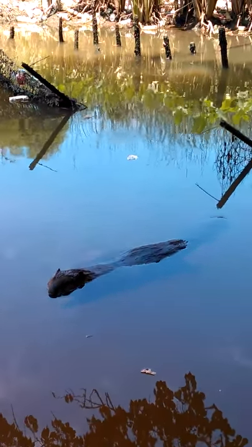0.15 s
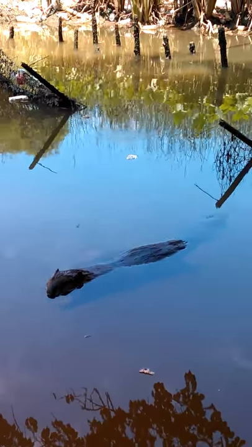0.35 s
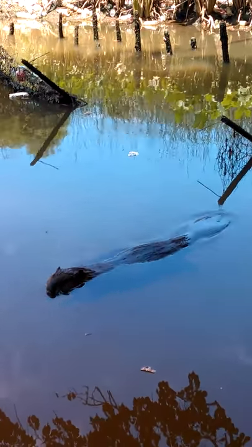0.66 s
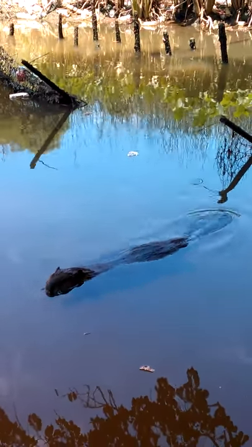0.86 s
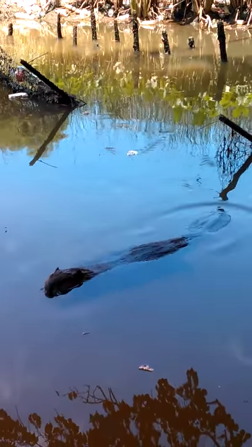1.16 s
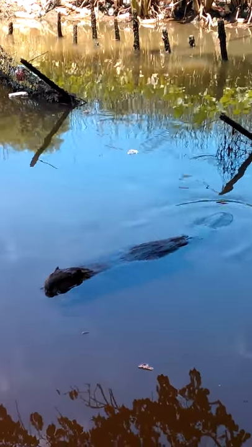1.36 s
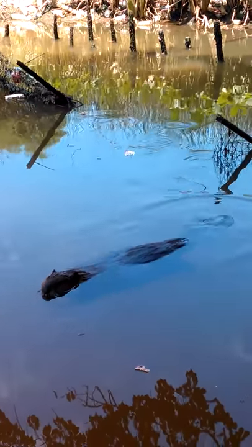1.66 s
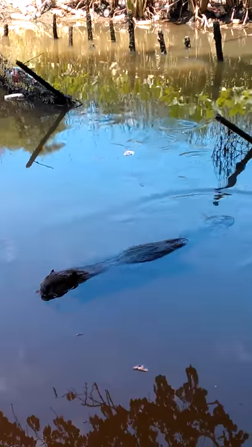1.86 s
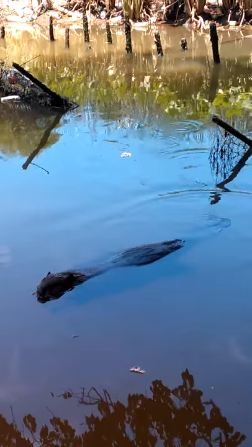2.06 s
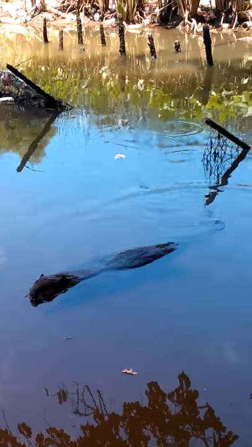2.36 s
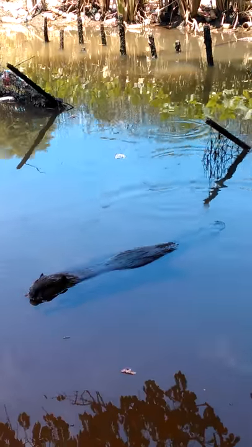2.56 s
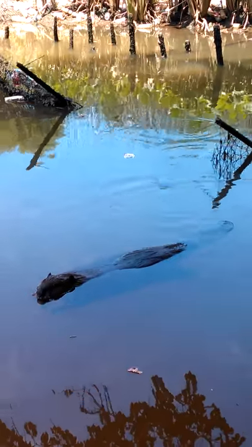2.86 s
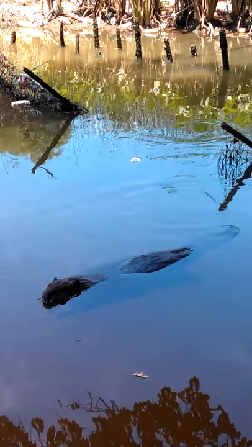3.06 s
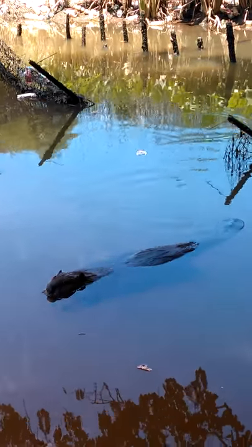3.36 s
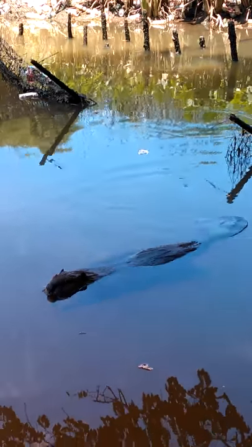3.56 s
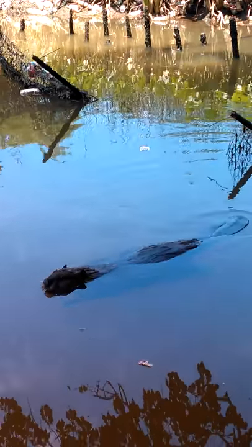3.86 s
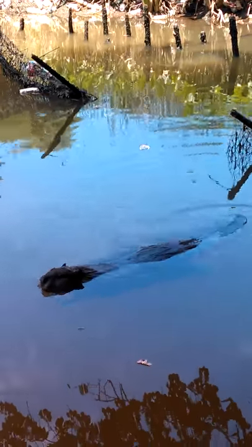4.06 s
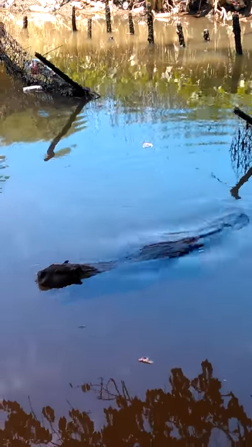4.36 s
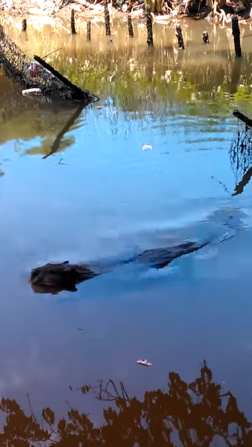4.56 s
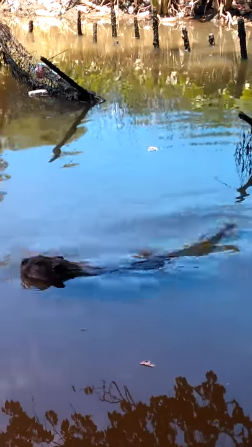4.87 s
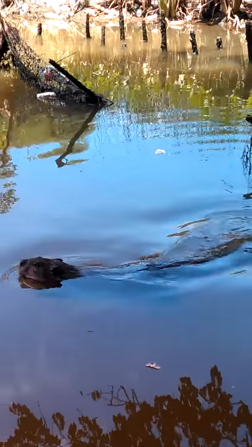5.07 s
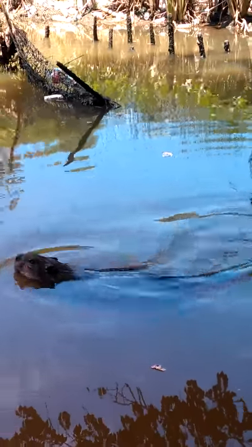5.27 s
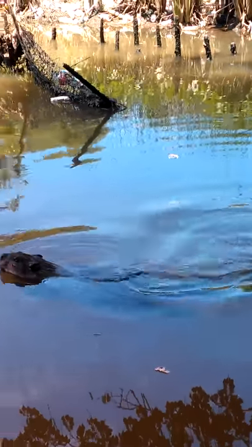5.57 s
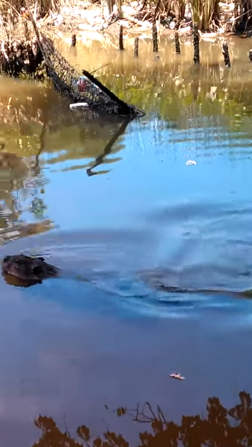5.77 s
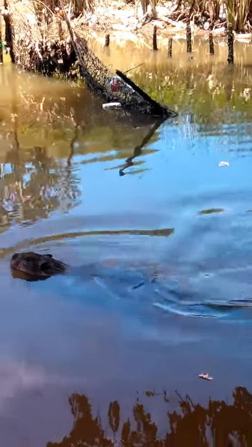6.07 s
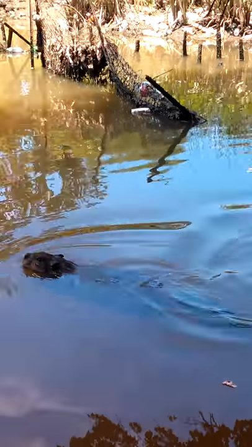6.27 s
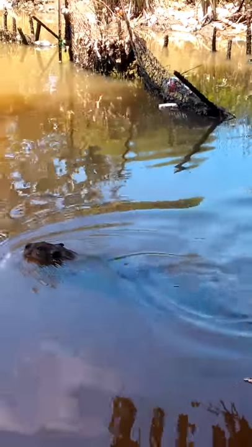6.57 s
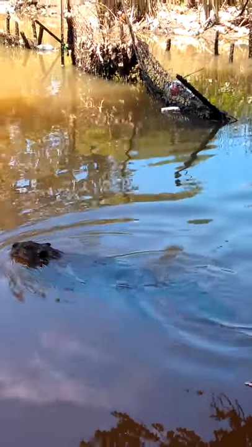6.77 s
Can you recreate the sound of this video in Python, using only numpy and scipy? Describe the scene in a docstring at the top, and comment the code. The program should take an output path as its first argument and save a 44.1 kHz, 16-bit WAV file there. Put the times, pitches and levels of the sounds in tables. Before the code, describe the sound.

Faint birds whistle, chirp and trill by a wooded pond over a steady low rumble of distant traffic.

```python
"""Seven seconds by a wooded pond. Far traffic rumbles throughout, over faint microphone hiss:
tyres hum, exhausts throb together. A bird opens with a scooped whistle, then come two thin, falling
'tseer' calls, echoed by the trees. After 2 s follow a distant bird's soft 'chack', a peep and a buzzy call;
from 3.5 s rough chips climb into a quick trill. Just after 5 s sharp ticks and rustles sound close by,
and again near 6.5 s, with a last 'tseer' and a faint whistle. Another far 'chack' ends it."""
import sys
import numpy as np
from scipy import signal
from scipy.fft import rfft, irfft, next_fast_len
from scipy.io import wavfile

SR = 44100
rng = np.random.default_rng(int(sys.argv[2]) if len(sys.argv) > 2 else 0)


def master(y):
    """Save y as 16-bit WAV."""
    cut = np.clip(np.atleast_2d(y).T, -1, 1)
    pcm = np.round(cut * 32767)  # scale
    wavfile.write(sys.argv[1], SR, pcm.astype(np.int16))


N = 305172
T = np.arange(N) / SR


def undb(db):
    """Turn decibels into a factor to multiply by."""
    return 10 ** (np.asarray(db) / 20)


def unit(x):
    """Scale a signal to an average strength (rms) of 1."""
    return x / np.sqrt(np.mean(x ** 2))


def curves(table, at):
    """Read a table between its rows, joining them with straight lines."""
    positions, *columns = np.transpose(table)
    return [np.interp(at, positions, column) for column in columns]


def add(out, start, x):
    """Mix x into out, beginning at start seconds."""
    i = int(np.clip(start * SR, 0, N - 1))
    out[i:i + len(x)] += x[:N - i]


def wobble(rate_hz, size=N):
    """A smooth random wobble of strength 1; a higher rate makes it quicker."""
    count = next_fast_len(size + SR)
    spectrum = rfft(rng.standard_normal(count))
    hz = np.arange(len(spectrum)) * SR / count
    return unit(irfft(spectrum * np.exp(-(hz / rate_hz) ** 2), count))[:size]


def noise(spectrum):
    """Noise of strength 1, shaped by (f/Hz, level/dB) points and fading beyond both ends."""
    hz, db = np.transpose(spectrum)
    f = np.maximum(np.arange(N // 2 + 1) * SR / N, 1)
    gain = undb(np.interp(np.log(f), np.log(hz), db))
    roll_off = np.minimum(f / hz[0], 1) ** 2 * np.minimum(hz[-1] / f, 1) ** 2
    return unit(irfft(rfft(rng.standard_normal(N)) * gain * roll_off, N))


# the microphone's hiss from low to high: (f/Hz, relative level/dB)
HISS_SPECTRUM = [(1500, -17.5), (3000, 3.5), (4500, -2), (6000, -1), (7500, 0), (8900, 0.5), (9900, -5.5),
                 (12000, -7.5), (13500, -6.5), (16000, -8)]


def microphone_hiss(level_db=-62.5):
    """The microphone adds a steady high hiss of its own."""
    return noise(HISS_SPECTRUM) * undb(level_db)


# the two road noises from low to high: (f/Hz, relative level/dB)
RUMBLE_SPECTRUM = [(22, -50), (36, -12.5), (50, 4.5), (64, 4), (95, -1.5), (130, -2), (175, -10),
                   (240, -10.5), (350, -17), (600, -26), (1200, -36.5)]
TYRE_SPECTRUM = [(350, -11.5), (700, -8), (850, -5), (1000, 0), (1300, -1), (1600, -7.5), (2100, -14.5),
                 (3000, -20), (4500, -29.5)]
# the slow ebb and flow of traffic: (t/s, rumble level/dB, tyre level/dB)
TRAFFIC_LEVELS = [(0, -38.5, -53), (1.3, -40.5, -52.6), (3.3, -39.5, -52), (5.2, -40.5, -52),
                  (6.92, -38, -52)]


def road():
    """Many far cars blend into a rumble and a tyre hum."""
    rumble_db, tyre_db = curves(TRAFFIC_LEVELS, T)
    rumble = noise(RUMBLE_SPECTRUM) * undb(rumble_db + .5 * wobble(7.7))
    tyres = noise(TYRE_SPECTRUM) * undb(tyre_db + .31 * wobble(9.4))
    return rumble + tyres


# far engines that come and go: (t/s, length/s, f/Hz, level/dB)
ENGINE_WHINES = [(-.1, .65, 146, -46.5), (1.4, .9, 133, -53), (3.9, .9, 131, -48), (4.9, 1.1, 130, -51),
                 (4.3, 1.2, 230, -57), (5.5, 1, 235, -56), (6.4, .7, 240, -50), (5.9, 1.2, 308, -60),
                 (6.15, .43, 576, -61), (5.7, 1.1, 533, -63)]


def engines():
    """Faint engine whines swell and fade; the long way here blurs their pitch."""
    out = np.zeros(N)
    for start, length, hz, db in ENGINE_WHINES:
        progress = np.clip((T - start) / length, 0, 1)
        swell = np.sqrt(np.abs(np.sin(np.pi * progress)))
        level = undb(db + 2 * wobble(9.9)) * swell
        out += np.sqrt(2) * level * np.sin(2 * np.pi * hz * T + .5 * wobble(4.1))
    return out


# an exhaust's tones at 1, 2 and 3 times its firing rate: relative level/dB
EXHAUST_HARMONICS = [0, -21.5, -28.5]


def exhaust(phase, waver_radians=.13):
    """One exhaust note with its overtones; the long way here makes it waver."""
    phase = phase + waver_radians * wobble(5.8)
    return np.sqrt(2) * sum(undb(db) * np.sin(k * phase) for k, db in enumerate(EXHAUST_HARMONICS, 1))


# two exhausts droning together: (t/s, length/s, firing f/Hz, climb/(Hz per s), gap to the second/Hz,
# change of gap/(Hz per s), level/dB, second compared with first/dB)
EXHAUST_PAIRS = [(.12, 0.6, 72, 4.36, -2, 2, -36, -11), (0.901, .5, 78, 7.4, -9.5, -0.5, -48, -3),
                 (1.52, 0.5, 68.2, 1.5, -10.5, 1, -41, -3), (2.11, 1.1, 69.1, 1.56, -7, 0.5, -38, -3.5),
                 (3.649, 0.38, 64.6, 1.9, 9.5, -1, -41.5, -0.5),
                 (4.165, 1.26, 66.44, 6.2, 10, -5.5, -34, -6), (5.879, 0.2, 77.8, 1, -4.5, -3.5, -35, -6.5),
                 (6.291, .7, 68.2, .1, 11, 0, -35.5, -6.5)]


def exhaust_throbs(fade_s=.14, flutter_db=1):
    """Two close pitches boost and cancel each other in turn, throbbing at the gap between them."""
    out = np.zeros(N)
    for start, length, hz, climb, gap_hz, gap_change, db, second_db in EXHAUST_PAIRS:
        t = T - start
        fade = np.clip(1 + np.minimum(t, length - t) / fade_s, 0, 1)
        swell = np.sin(np.pi / 2 * fade) ** 2
        phase = 2 * np.pi * (hz * t + climb * t ** 2 / 2 + rng.random())
        beat = 2 * np.pi * (gap_hz * t + gap_change * t ** 2 / 2)
        out += undb(db) * swell * (exhaust(phase) + undb(second_db) * exhaust(phase + beat))
    return out * undb(flutter_db * wobble(19))


# a distant bird's 'chack' calls (first and last rows) and soft rustles nearby (the rest):
# (t/s, length/s, middle f/Hz, band width/Hz, level/dB)
CHACKS_AND_RUSTLES = [(2.11, 0.077, 2950, 894, -60.5), (5.02, 0.26, 560, 170, -59.5),
                      (5.122, 0.13, 9000, 6000, -65), (5.783, 0.097, 10000, 6930, -70),
                      (6.422, 0.15, 10500, 5000, -69), (6.877, 0.077, 2930, 1104, -59)]


def chacks_and_rustles(grain_db=3):
    """Soft, noisy bird calls and rustles: each a short burst of grainy noise that rises fast and fades."""
    out = np.zeros(N)
    for start, length, hz, width, db in CHACKS_AND_RUSTLES:
        count = int(length * SR)
        grains = rng.standard_normal(count) * undb(grain_db * wobble(300, size=count))
        edges_hz = np.clip([hz - width / 2, hz + width / 2], 100, .45 * SR)
        band = signal.sosfilt(signal.butter(2, edges_hz, "band", fs=SR, output="sos"), grains)
        swell = np.interp(np.linspace(0, 1, count), [0, .15, 1], [0, 1.4, 0])
        add(out, start, undb(db) * unit(band) * swell)
    return out


# the tones inside a tick: (f/Hz, fade time/s, relative level/dB); a tone drops 60 dB in its fade time
TICK_TONES = [(2200, .003, -14), (3400, .004, -7), (4130, .005, -2), (5520, .004, 0), (6280, .004, 0),
              (7400, .002, -1), (8650, .004, -2), (10600, .003, -6), (12500, .002, -9)]
# each tick: (t/s, peak level/dB, brightness/(dB per octave))
SHARP_TICKS = [(5.0787, -38, -3), (5.1033, -44, 0), (5.1237, -36, 2), (5.125, -30.3, 1.5), (5.132, -49, 3),
               (5.33, -49, 5), (6.4705, -45, 1), (6.5135, -48, 12)]


def ticks():
    """Tiny snaps close by, each ringing for a few thousandths of a second."""
    out, t = np.zeros(N), T[:SR // 20]
    for start, peak_db, brightness in SHARP_TICKS:
        ring = np.zeros(len(t))
        for hz, fade_s, db in TICK_TONES:
            level = undb(db + brightness * np.log2(hz / 6000) - 60 * t / fade_s)
            ring += level * np.sin(2 * np.pi * (hz * t + rng.random()))
        add(out, start, undb(peak_db) * ring / np.abs(ring).max())
    return out


def tree_echo(x, trunks_db, trunks_fade_s=.25, tail_fade_s=1, onset_s=.0034):
    """Sound bounces off near trunks as separate echoes, and off the whole wood as a long, soft tail."""
    t = T[:SR]
    bounces = rng.standard_normal(SR) * (rng.random(SR) < 400 / SR)  # about 400 a second
    trunks = bounces * undb(-60 * t / trunks_fade_s)
    tail = rng.standard_normal(SR) * undb(-60 * t / tail_fade_s)
    echo = (undb(trunks_db) * unit(trunks) + unit(tail)) * np.minimum(t / onset_s, 1)
    return signal.fftconvolve(x, echo / np.linalg.norm(echo))[:N]


def bird_note(shape, length, pitch_ratio, rasp_depth=.071, rasp_hz=900, waver=.0063, flutter_db=1.5):
    """A bird's voice box sings one sliding tone; shaking its pitch quickly makes it rasp."""
    count = int(length * SR)
    hz, db, *rasp = curves(shape, np.linspace(0, 1, count))
    shake = waver + (rasp_depth * rasp[0] if rasp else 0)
    hz = hz * pitch_ratio * (1 + shake * wobble(rasp_hz, size=count))
    flutter = unit(undb(flutter_db * wobble(120, size=count)))
    level = undb(db) * flutter * signal.windows.tukey(count, .1)
    return np.sqrt(2) * np.sin(2 * np.pi * np.cumsum(hz) / SR) * level


def song(shape, notes):
    """Sing one note shape at each of the listed times."""
    out = np.zeros(N)
    for start, length, pitch_ratio, db in notes:
        add(out, start, undb(db) * bird_note(shape, length, pitch_ratio))
    return out


# a buzzier 'tseer' that hardly falls: (progress/0-1, f/Hz, relative level/dB, rasp/0-1)
BUZZ_SHAPE = [(0, 5550, 2, 0.78), (.15, 6130, -3.5, 0.92), (.25, 5860, -14, 0.47), (.4, 6270, 3, 1),
              (.6, 6100, -4.5, 0.38), (.8, 5770, -0.5, 0.32), (1, 5340, -3, 0.4)]
# each buzz: (t/s, length/s, pitch ratio, relative level/dB)
BUZZ_CALLS = [(2.674, .135, .985, -56), (5.152, .135, 1.015, -56.5)]


def buzzes():
    """Raspy calls from deep in the trees, more echo than direct sound."""
    direct = song(BUZZ_SHAPE, BUZZ_CALLS)
    return undb(-4.5) * direct + undb(-1.5) * tree_echo(direct, trunks_db=-5)


# the two voices of a 'tseer': (progress/0-1, f/Hz, relative level/dB, rasp/0-1)
TSEER_LOW_VOICE = [(0, 5050, 1, .6), (.06, 5400, -1, 1), (.12, 7000, 1.5, 1), (.2, 6900, -7.5, 1),
                   (.33, 6050, -13, .5), (.5, 6250, -2, .2), (.66, 6090, .5, .15), (.83, 5700, -2.5, .1),
                   (1, 5100, -4, .15)]
TSEER_HIGH_VOICE = [(0, 7200, -33, 1), (.12, 7700, 3.5, 0.34), (.3, 7600, -11, .5), (.5, 7200, -14, 0.17),
                    (.7, 7100, -4, 0.14), (1, 6900, -35, .1)]
# each call: (t/s, length/s, pitch ratio, direct level/dB, echo level/dB,
# trunks compared with tail/dB, high voice gain/dB)
TSEER_CALLS = [(0.823, 0.13, 0.97, -59.5, -54.5, -2, -5), (1.36, .145, 0.97, -64.5, -59.5, 0, -6),
               (4.257, .125, 0.98, -58, -57.5, 4, -1.5), (6.359, 0.13, 1, -56, -57, 8, -4)]


def tseers():
    """Both sides of the voice box flick up with a rasp, then fall; a farther bird has more echo."""
    out = np.zeros(N)
    for start, length, pitch_ratio, direct_db, echo_db, trunks_db, high_db in TSEER_CALLS:
        low = bird_note(TSEER_LOW_VOICE, length, pitch_ratio)
        high = bird_note(TSEER_HIGH_VOICE, length, pitch_ratio)
        call = np.zeros(N)
        add(call, start, low + undb(high_db) * high)
        out += undb(direct_db) * call + undb(echo_db) * tree_echo(call, trunks_db)
    return out


# one rough chip: (progress/0-1, f/Hz, relative level/dB, rasp/0-1)
CHIP_SHAPE = [(0, 2960, -2, .6), (.25, 2790, -1.5, .5), (.55, 2900, -1.5, .7), (.8, 3040, -4.5, .8),
              (1, 3030, -10, .8)]
# one clear peep: (progress/0-1, f/Hz, relative level/dB)
PEEP_SHAPE = [(0, 2820, -10), (.3, 2584, 0), (.7, 2560, -2), (1, 2570, -14)]
# the chips before the trill, and the peeps: (t/s, length/s, pitch ratio, relative level/dB)
OPENING_CHIPS = [(3.485, 0.039, .66, -57.5), (3.62, 0.036, 0.77, -57.5), (3.75, .04, .77, -57)]
PEEPS = [(2.28, 0.025, 1.2, -63), (3.853, .048, 1.0, -54.5), (5.835, 0.039, 0.775, -56.5)]


def trill(start_s=3.945, gap_s=.099, slowing_s=.0014, chip_s=.0414, chip_count=9):
    """A bird peeps and chips its way up to a quick run that slows, rises and fades a little."""
    run = []
    for k in range(chip_count):
        start = start_s + gap_s * k + slowing_s * k * (k - 1) / 2
        pitch_ratio, db = 1 + .0065 * k, -52.5 - .57 * k
        run.append((start, chip_s, pitch_ratio, db))
    direct = song(CHIP_SHAPE, OPENING_CHIPS) + song(CHIP_SHAPE, run) + song(PEEP_SHAPE, PEEPS)
    return undb(-3) * (direct + tree_echo(direct, trunks_db=3))


# a whistle that dips and rises again: (progress/0-1, f/Hz, relative level/dB)
WHISTLE_SHAPE = [(0, 3620, -19), (.1, 3520, -7), (.25, 3340, -2), (.42, 3230, -1), (.58, 3205, -2),
                 (.75, 3300, -5), (.9, 3430, -6), (1, 3440, -11)]
# each whistle: (t/s, length/s, pitch ratio, relative level/dB)
WHISTLE_CALLS = [(.128, .2, .988, -55), (1.74, .19, .997, -57.5), (3.895, .19, 1.005, -57),
                 (5.338, .2, 1.015, -53.5), (6.48, .19, 1.02, -66)]


def whistles():
    """Scooped bird whistles; echoes from the trunks overlap the sliding pitch and make it waver."""
    direct = song(WHISTLE_SHAPE, WHISTLE_CALLS)
    return undb(-3.5) * direct + undb(-5) * tree_echo(direct, trunks_db=0)


def scene():
    """Everything heard from the bank of the pond, in one channel."""
    background = road() + microphone_hiss() + engines() + exhaust_throbs()
    small_sounds = chacks_and_rustles() + ticks()
    birdsong = buzzes() + tseers() + trill() + whistles()
    return (background + small_sounds + birdsong)[None]


def record(dry, top_hz=15600):
    """Cut away the very highest treble."""
    return signal.sosfilt(signal.ellip(10, .2, 80, top_hz, fs=SR, output="sos"), dry)


dry = scene()
out = record(dry)
master(out)
```